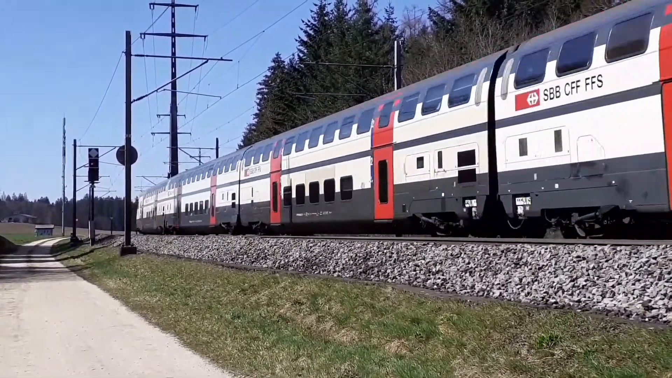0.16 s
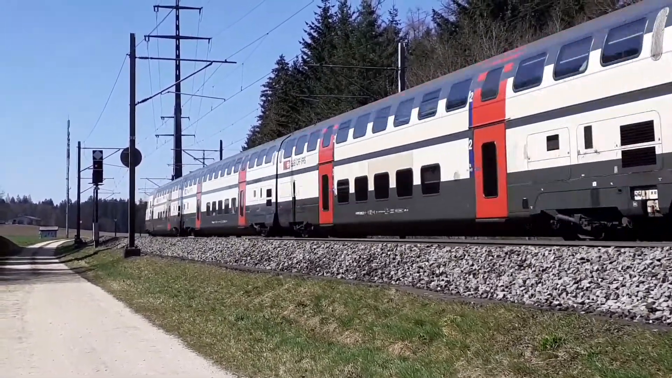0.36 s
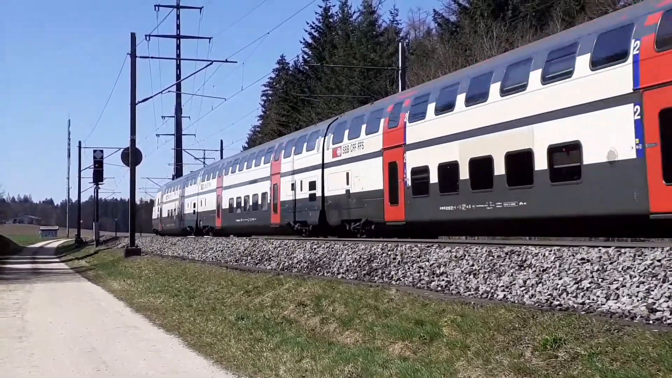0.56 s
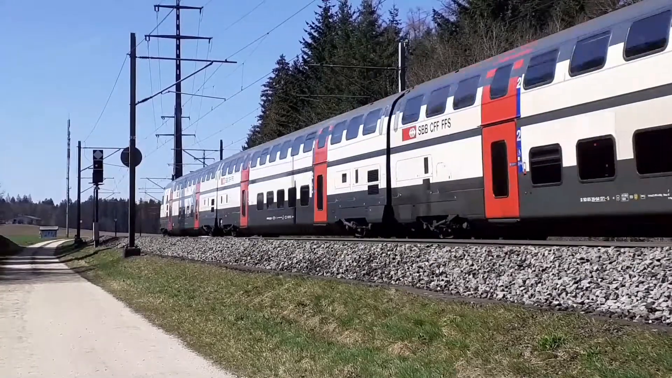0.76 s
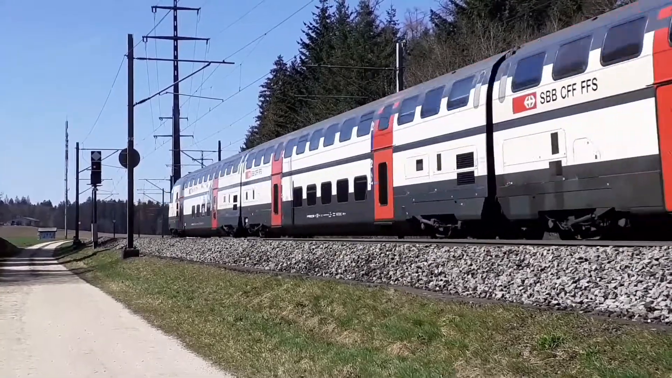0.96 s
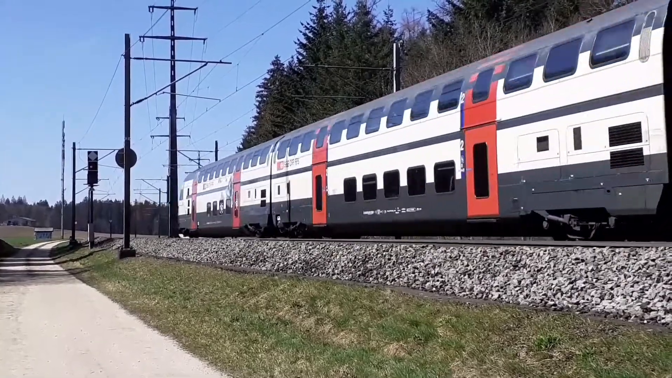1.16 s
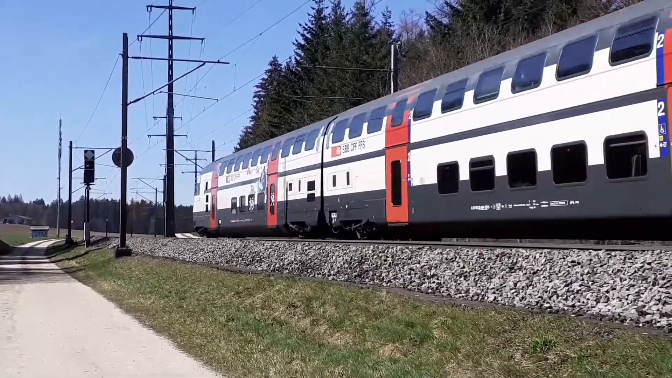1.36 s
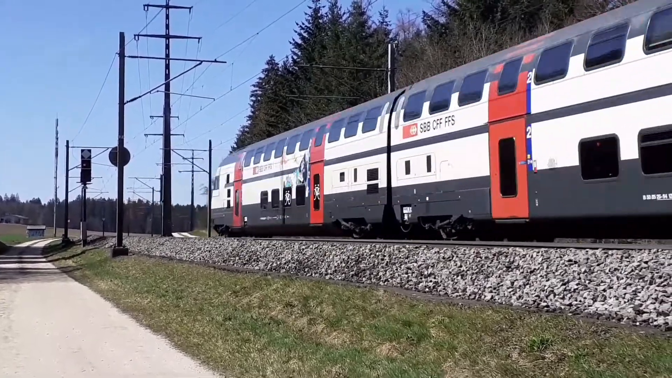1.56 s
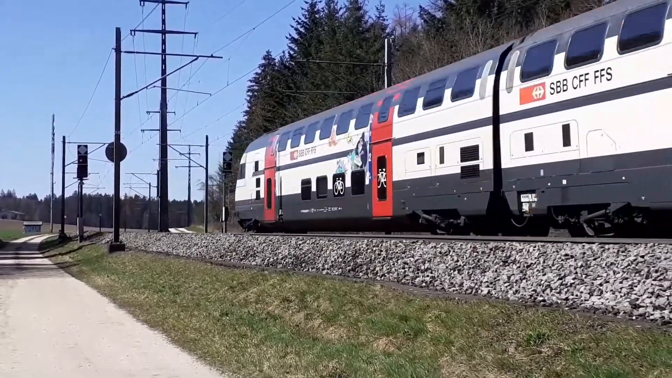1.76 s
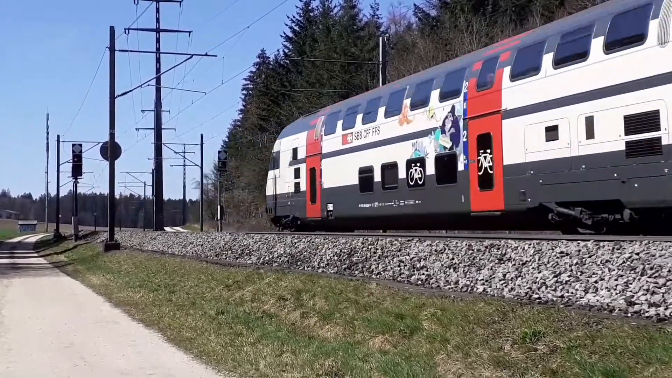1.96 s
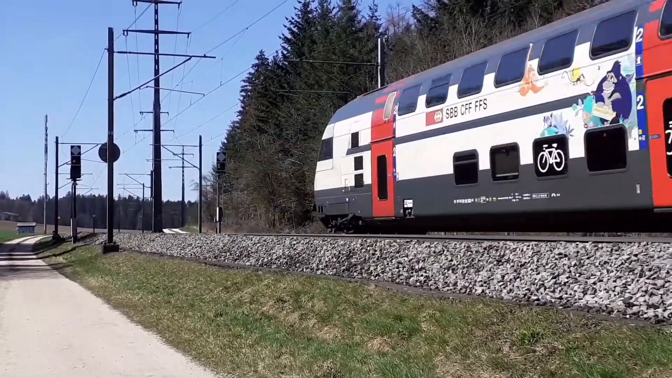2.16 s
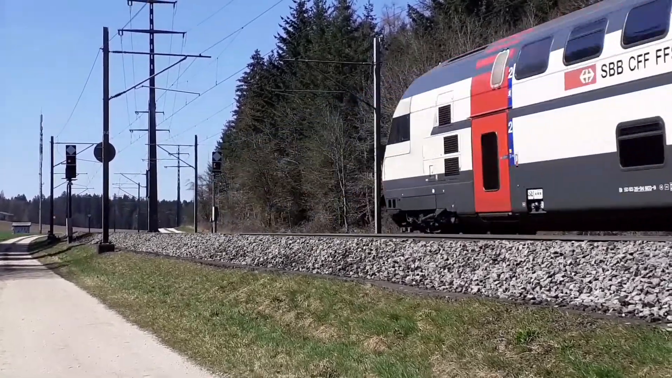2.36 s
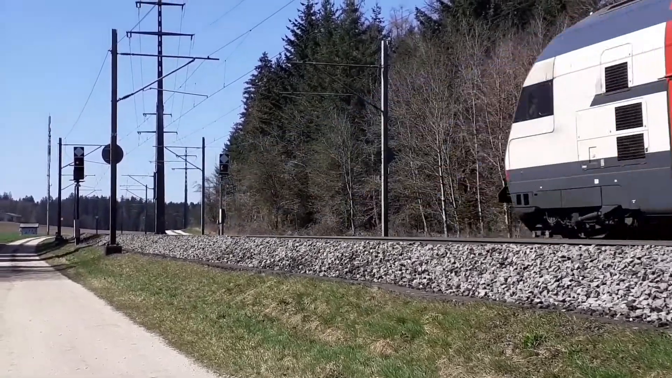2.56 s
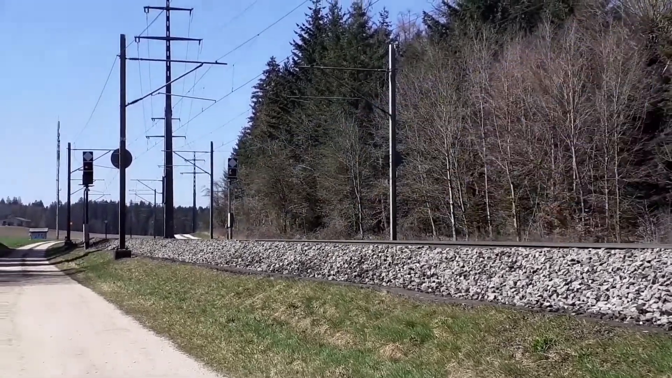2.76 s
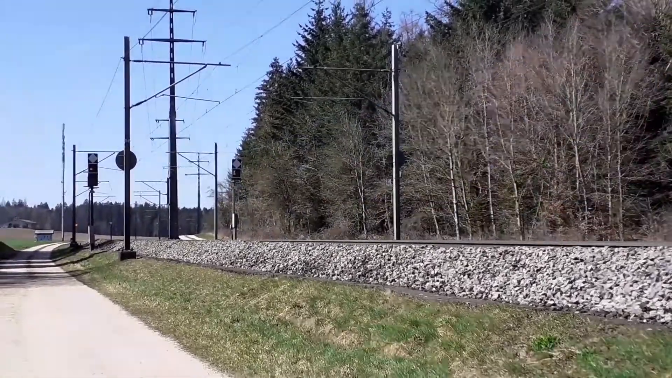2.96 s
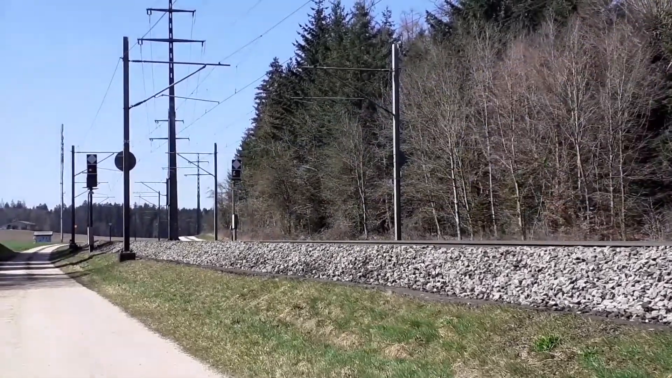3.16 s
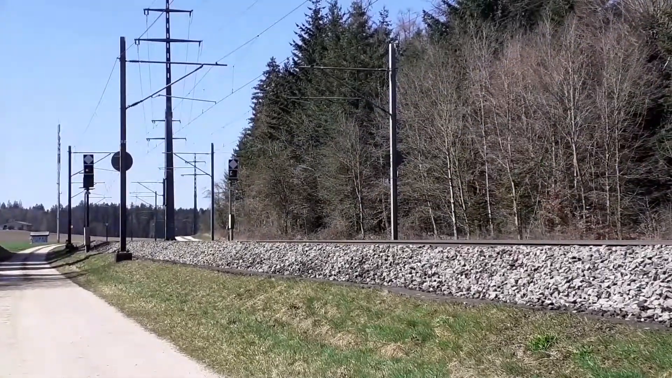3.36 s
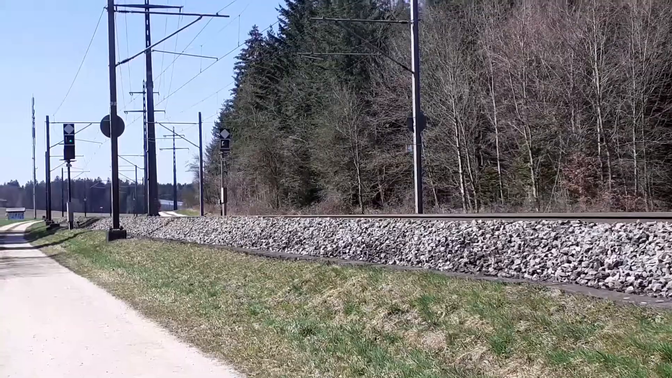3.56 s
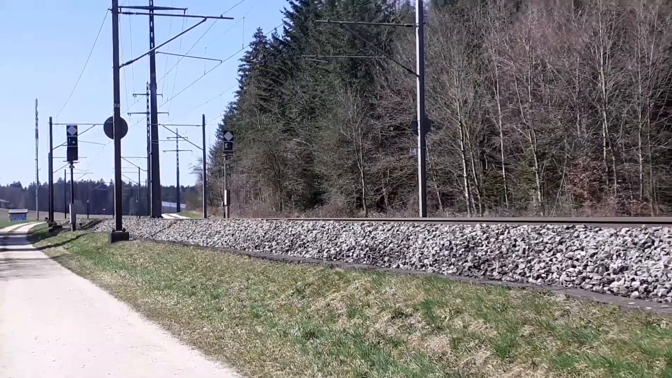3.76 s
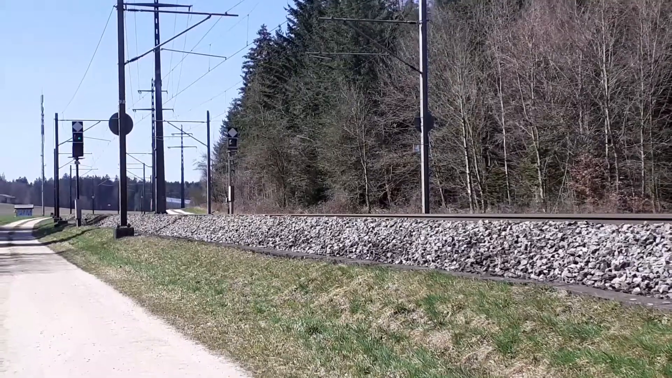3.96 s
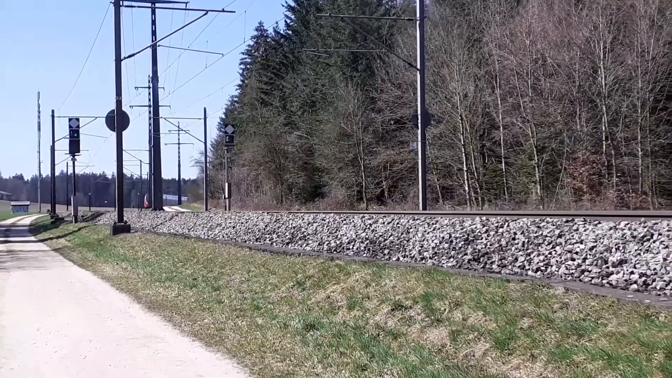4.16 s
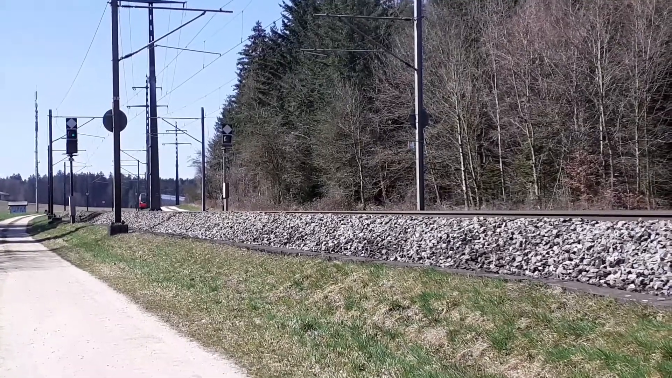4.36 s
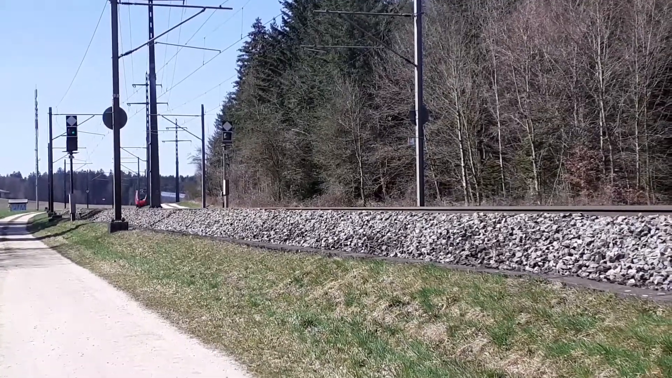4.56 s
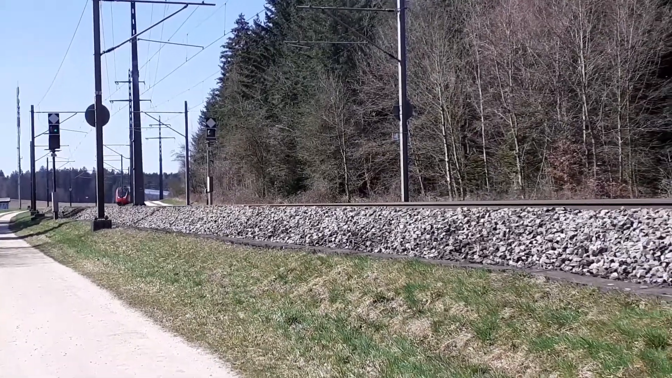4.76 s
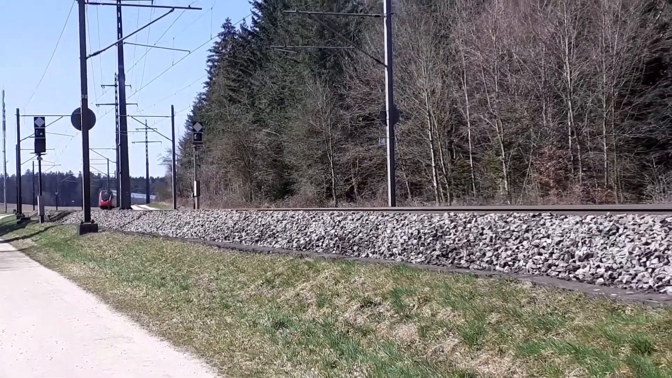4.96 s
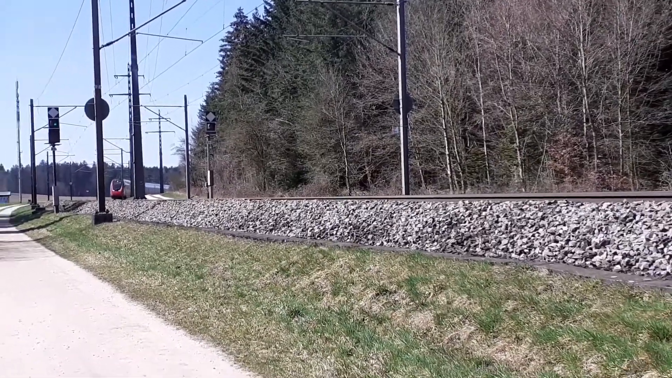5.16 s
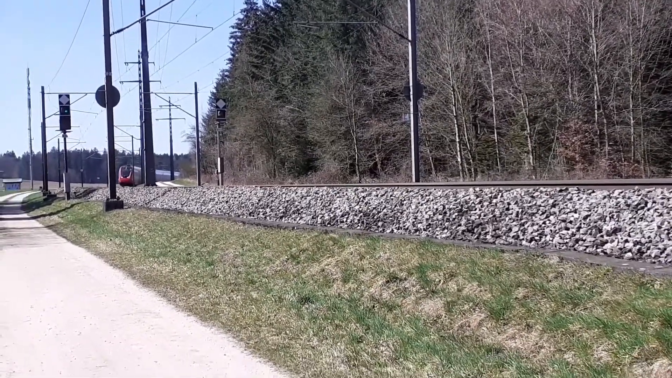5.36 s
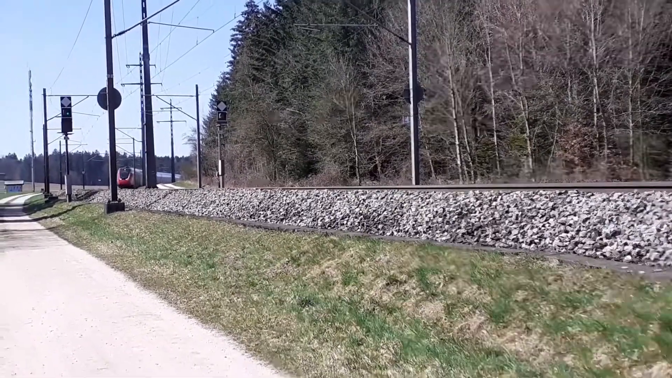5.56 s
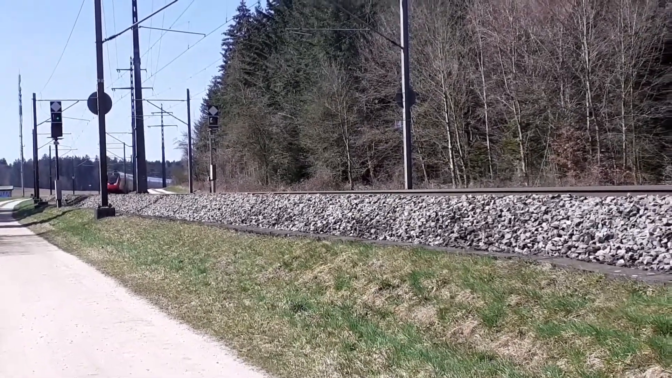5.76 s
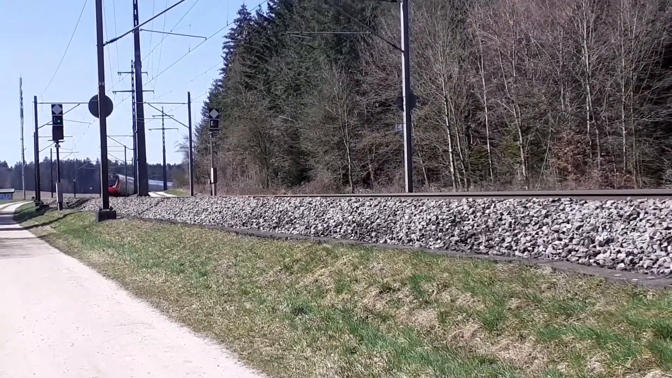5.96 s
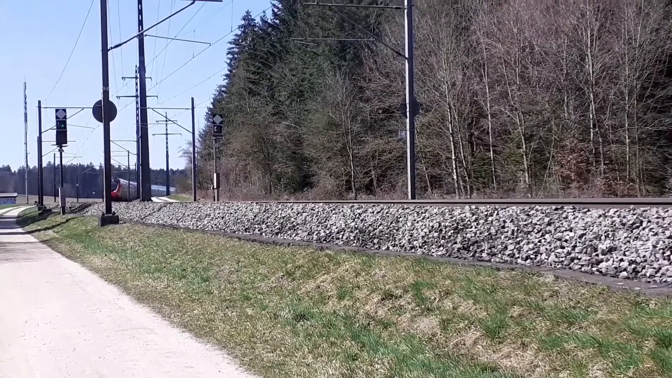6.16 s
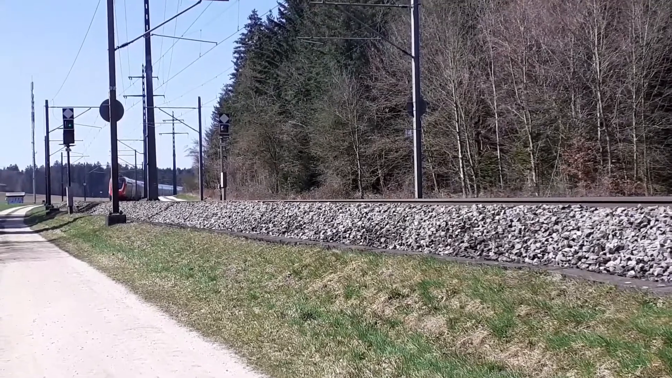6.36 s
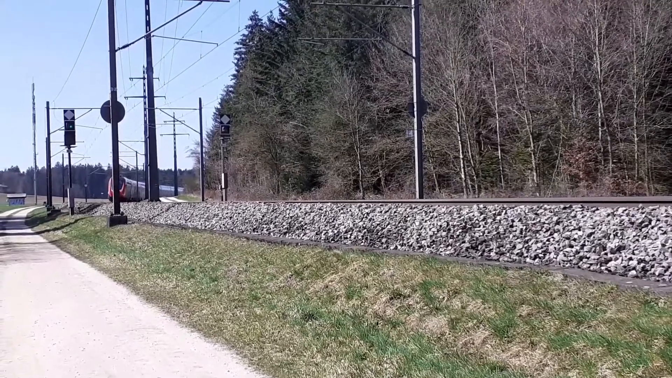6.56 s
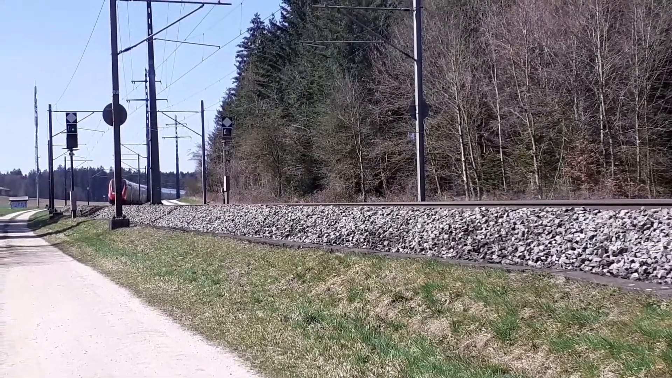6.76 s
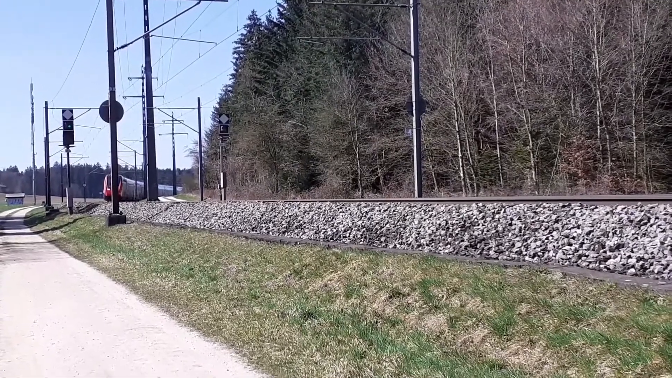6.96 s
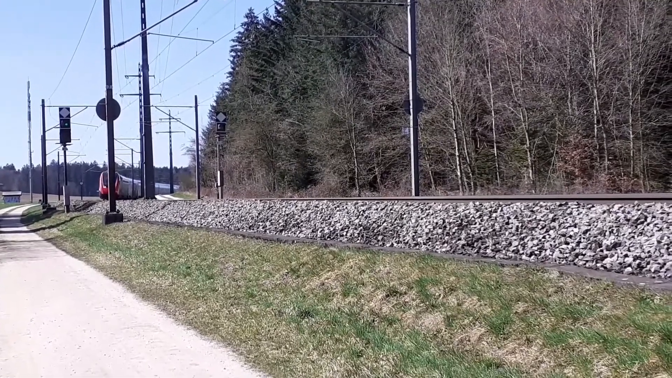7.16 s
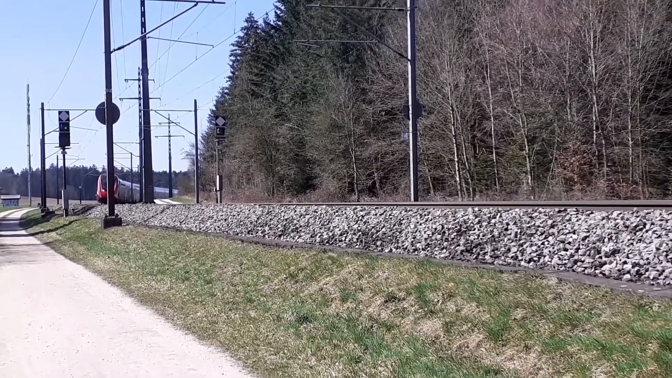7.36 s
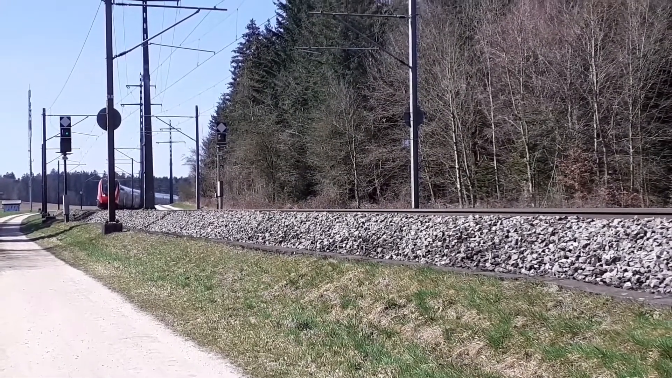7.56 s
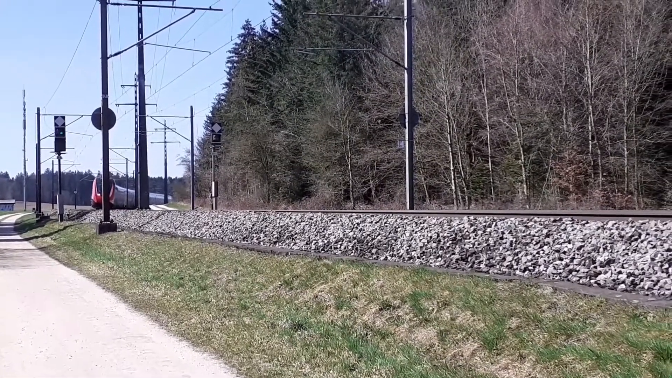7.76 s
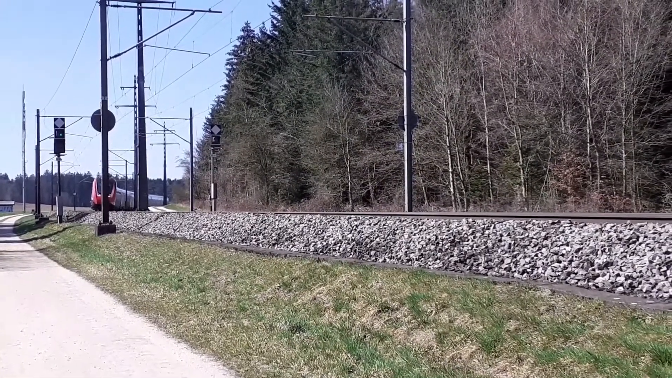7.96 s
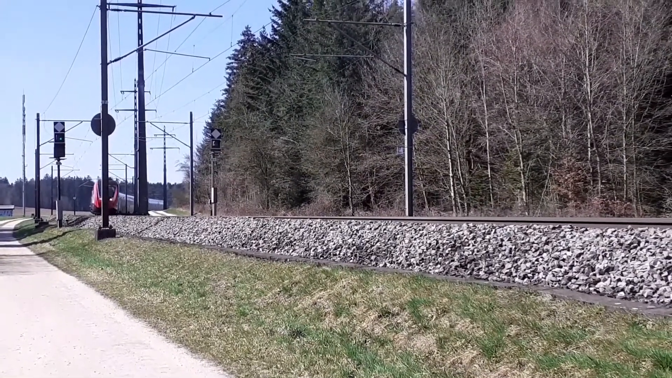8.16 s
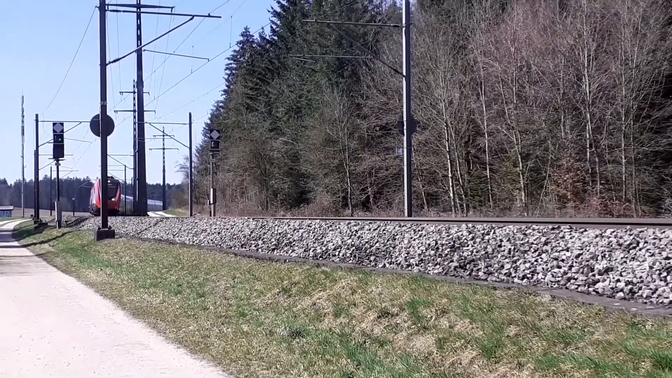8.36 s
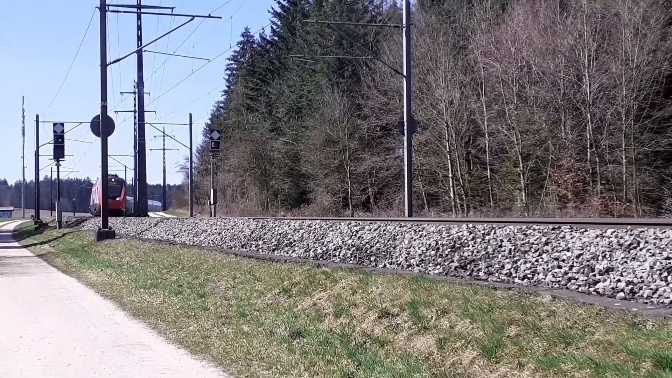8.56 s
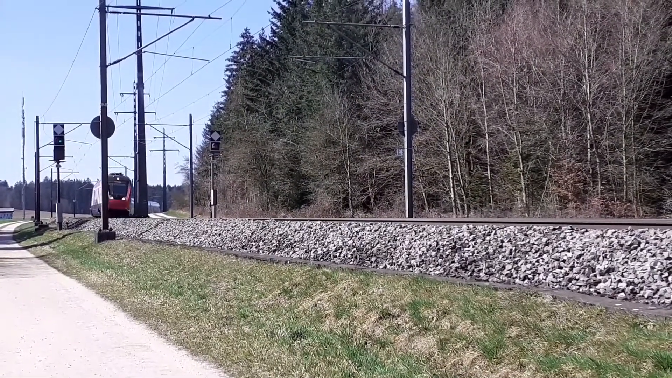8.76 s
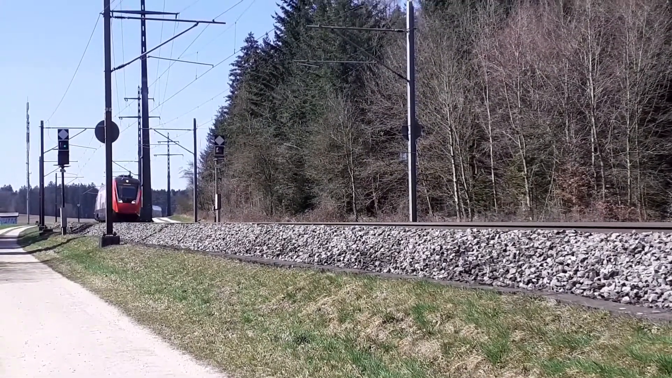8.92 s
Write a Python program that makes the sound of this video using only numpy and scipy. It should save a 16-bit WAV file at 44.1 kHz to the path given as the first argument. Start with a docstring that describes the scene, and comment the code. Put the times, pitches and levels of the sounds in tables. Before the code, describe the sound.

A passenger train roars past with ringing, squealing wheels, cuts off abruptly, then quiet birdsong, a light breeze and a distant train approaching.

```python
"""Field path by a railway: a double-deck passenger train rushes past; wheels roar, ring and fall in pitch.
The pass-by is banded noise swept by bogie, resonated wheel modes and gliding squeals.
After an abrupt cut the same place is quiet: a great tit and other birds, whistled along pitch tracks, call
from the forest edge; a breeze nudges the microphone; a second train, in growing noise bands, draws near."""
import sys
import numpy as np
from scipy import signal
from scipy.io import wavfile
from scipy.ndimage import map_coordinates

SR = 44100
rng = np.random.default_rng(int(sys.argv[2]) if len(sys.argv) > 2 else 0)


def master(y):
    """Save y as 16-bit WAV."""
    cut = np.clip(np.atleast_2d(y).T, -1, 1)
    pcm = np.round(cut * 32767)  # scale
    wavfile.write(sys.argv[1], SR, pcm.astype(np.int16))


N = 400869
TIME = np.arange(N) / SR
CUT_S, RESUME_S = 3.385, 3.405
SPEED_M_PER_S, TRACK_DISTANCE_M, SOUND_SPEED_M_PER_S = 34.0, 12.0, 343
PORT_LAG_MS = 0.518  # left port's lag for sound from due right
MIC_TURN_RAD = 0.34  # from up the line towards the track
CUTOFF_HZ = 15740


def from_db(db):
    """Decibels to amplitude."""
    return 10 ** (np.asarray(db) / 20)


def rms_one(x):
    """Scale to unit power."""
    return x / np.sqrt(np.mean(x ** 2) + 1e-20)


def in_time(rows):
    """One interpolated curve per table column after time."""
    time_s, *columns = np.transpose(rows)
    return [np.interp(TIME, time_s, column) for column in columns]


def at_hz(points, hz):
    """Read a spectrum on a log-frequency axis."""
    table_hz, values = np.array(points).T
    return np.interp(np.log(hz), np.log(table_hz), values)


def pan(balance_db):
    """Left and right gains of constant power; positive is left."""
    return rms_one(from_db([[balance_db / 2], [-balance_db / 2]]))


def drift(rate_hz):
    """Slow random signal with a spread of 1: noise through a double pole at SR / 40."""
    r = np.exp(-80 * np.pi * rate_hz / SR)
    noise = rng.standard_normal(N // 40 + 2002)
    slow = signal.lfilter([1], [1, -2 * r, r * r], noise)[2000:]
    return np.interp(np.arange(N) / 40, np.arange(len(slow)), rms_one(slow))


def resonate(x, hz, width_hz):
    """Two-pole resonance with gain 1 on top."""
    r = np.exp(-np.pi * width_hz / SR)
    zeros = np.array([1, 0, -1]) * (1 - r * r) / 2
    poles = [1, -2 * r * np.cos(2 * np.pi * hz / SR), r * r]
    return signal.lfilter(zeros, poles, x + 1e-18)


def stereo_noise(spectrum, likeness, balance):
    """Noise bands, relatively narrower in the treble, each with its level, likeness and pan; rms 1."""
    low_hz, top_hz = spectrum[0][0], min(spectrum[-1][0], .45 * SR)
    steps = int(np.ceil((top_hz ** .3 - low_hz ** .3) / .4))
    edges_hz = np.linspace(low_hz ** .3, top_hz ** .3, max(steps, 6) + 1) ** (1 / .3)
    white, out = rng.standard_normal((2, 2, N)), 0
    for k, band_hz in enumerate(zip(edges_hz, edges_hz[1:])):
        band_filter = signal.butter(2, band_hz, "band", fs=SR, output="sos")
        mid, side = signal.sosfilt(band_filter, white[k % 2])
        hz = np.sqrt(band_hz[0] * band_hz[1])
        alike = np.clip(at_hz(likeness, hz), -1, 1)
        mid, side = np.sqrt(1 + alike) * mid, np.sqrt(1 - alike) * side
        gains = from_db(at_hz(spectrum, hz)) * pan(at_hz(balance, hz))
        out = out + gains * np.array([mid + side, mid - side])
    return rms_one(out)


def from_right(x, off_axis_rad=MIC_TURN_RAD):
    """The left port hears the side of the track later."""
    lag_s = PORT_LAG_MS / 1000 * np.cos(off_axis_rad)
    return np.array([np.interp(TIME - lag_s, TIME, x[0]), x[1]])


def port_lag(t, abeam_s):
    """Left port's lag in seconds as a wheel swings from ahead to the right."""
    bearing_rad = np.arctan2(TRACK_DISTANCE_M, SPEED_M_PER_S * (abeam_s - t)) - MIC_TURN_RAD
    return PORT_LAG_MS / 1000 * np.sin(bearing_rad)


def wheel_path(t, abeam_s):
    """Emission time heard at each port (the Doppler glide), and how squarely the wheel faces the microphone."""
    distance_m = np.hypot(TRACK_DISTANCE_M, SPEED_M_PER_S * (t - abeam_s))
    emitted_s = t - (distance_m - TRACK_DISTANCE_M) / SOUND_SPEED_M_PER_S
    return np.array([emitted_s - port_lag(t, abeam_s), emitted_s]), TRACK_DISTANCE_M / distance_m


# two cars meet over a pair of bogies:
# (time abeam [s], rolling [dB], hiss [dB], wheel ring [dB], wheel pitch [multiple])
CAR_ENDS = [(.035, -28, -35.5, -31, 1.005), (.8, -25, -31.5, -32, 1.01), (1.62, -26.5, -31.5, -33, 1.001),
            (2.421, -28, -34, -33, 1.001), (3.19, -30, -37, -30, .985)]
BOGIE_GAP_S = .2  # within a pair


def bogies():
    """A row for each bogie, one before and one behind each car end."""
    return [(s + side * BOGIE_GAP_S / 2, *levels) for s, *levels in CAR_ENDS for side in (-1, 1)]


# pass-by noise spectra: (frequency [Hz], density [dB per Hz])
RUMBLE_SPECTRUM = [(15, -44.5), (25, -20.5), (47, -9), (81, 5), (105, -4), (146, -7.5), (170, -15),
                   (220, -40.5), (370, -120)]
BODY_SPECTRUM = [(130, -12), (170, -10.5), (260, -4.5), (340, -5), (480, -0.5), (560, -9), (800, -6.5),
                 (1050, -11.5), (1300, -29.5)]
ROLLING_SPECTRUM = [(850, -4), (1020, -5), (1300, -3.5), (1600, -8), (2100, -1), (2550, -5.5), (3300, -3.5),
                    (3800, -4), (4400, 4.5), (5200, -7.5), (6000, -14), (7000, -24)]
HISS_SPECTRUM = [(4500, -14), (5600, 3.5), (6500, 8.5), (7600, -0.5), (8600, -4.5), (9400, -31),
                 (10700, 4.5), (11700, -8), (12800, -4.5), (15000, -26), (15700, -33.5)]
# a single bogie's roar: (frequency [Hz], left-right likeness [-1 to 1])
BOGIE_LIKENESS = [(1100, 0.98), (1500, 0.38), (2200, 0.59), (2700, .55), (3150, 0.87), (3800, 0.83),
                  (4500, 0.21)]
# near sound: (frequency [Hz], left-right likeness [clipped to -1 to 1])
NEAR_LIKENESS = [(40, 3), (90, 1.5), (250, 1), (500, 0.74), (700, -0.13), (1040, 1.5), (1400, 4),
                 (3000, -0.7), (8000, -0.2)]
# near sound: (frequency [Hz], left minus right [dB])
NEAR_BALANCE = [(60, 0), (400, 1.5), (1300, 1.5), (2200, -2), (3000, -2), (4400, -8), (6300, -10),
                (10500, -16), (15000, -8)]
# low mids from the car bodies: (time [s], level [dB])
BODY_LEVEL = [(0.0, -33.5), (0.53, -32.5), (0.79, -30.5), (1.17, -32.5), (2.12, -33), (3.1, -32),
              (3.27, -29), (3.36, -28.5)]
ROLLING_BEAM, HISS_BEAM = 2.41, 2.15  # sideways aim, exponents
HISS_LEAD_S = 0.11  # hiss is thrown ahead of the wheels
RUMBLE_DB, RUMBLE_FADE_DB_PER_S = -32, 1.3


def rolling_roar(flutter_db=1.35):
    """Air and car bodies rumble; rough rails roar and hiss under each bogie, roar sweeping from ahead to right."""
    rumble = stereo_noise(RUMBLE_SPECTRUM, NEAR_LIKENESS, NEAR_BALANCE)
    body = stereo_noise(BODY_SPECTRUM, NEAR_LIKENESS, NEAR_BALANCE)
    hiss = stereo_noise(HISS_SPECTRUM, NEAR_LIKENESS, NEAR_BALANCE)
    rolling = stereo_noise(ROLLING_SPECTRUM, BOGIE_LIKENESS, NEAR_BALANCE)
    t, hiss_power = TIME[TIME < RESUME_S], 0
    rails = from_db(in_time(BODY_LEVEL)[0]) * from_right(body)
    for k, (abeam_s, rolling_db, hiss_db, _, _) in enumerate(bogies()):
        # each bogie has its own stretch of noise
        left, right = np.roll(rolling, -k * SR // 2, axis=1)[:, :len(t)]
        swept = np.array([np.interp(t - port_lag(t, abeam_s), t, left), right])
        _, facing = wheel_path(t, abeam_s)
        rails[:, :len(t)] += from_db(rolling_db) * facing ** ROLLING_BEAM * swept
        _, hiss_facing = wheel_path(t, abeam_s - HISS_LEAD_S)
        hiss_power += (from_db(hiss_db) * hiss_facing ** HISS_BEAM) ** 2
    rails += np.interp(TIME, t, np.sqrt(hiss_power)) * from_right(hiss)
    rumble_gain = from_db(RUMBLE_DB - RUMBLE_FADE_DB_PER_S * TIME)
    return rumble_gain * from_right(rumble) + from_db(flutter_db * drift(15)) * rails


BOOM_HZ, BOOM_WIDTH_HZ, BOOM_DB, BOOM_FADE_DB_PER_S = 248, 44, -35.5, 7


def boom():
    """One low resonance of the car bodies, stirred by the ride, dies away."""
    ring = rms_one(resonate(rng.standard_normal(N), BOOM_HZ, BOOM_WIDTH_HZ))
    gain = from_db(BOOM_DB - BOOM_FADE_DB_PER_S * TIME)
    return from_right(pan(0.9) * gain * ring)


# wheel modes at rest: (frequency [Hz], width [Hz], level [dB])
WHEEL_MODES = [(1614, 22, -9), (1915, 100, -7), (2133, 51, -5.5), (3547, 56, -17.5), (4285, 39, -3),
               (6447, 70.3, -5.5), (7800, 46, -16.5), (10750, 105.3, -13), (12800, 200, -19.5)]


def ringing_wheels(beam=4.3, unrest_db=3.0):
    """Rail roughness excites the wheel modes, which beam sideways and glide down in passing."""
    t, out = TIME[TIME < CUT_S], np.zeros((2, N))
    for abeam_s, _, _, level_db, pitch in bogies():
        emitted_s, facing = wheel_path(t, abeam_s)
        roughness = rng.standard_normal(len(t) + SR)
        ring = 0
        for hz, width_hz, db in WHEEL_MODES:
            mode = rms_one(resonate(roughness, hz * pitch, width_hz))
            ring = ring + from_db(db) * pan(at_hz(NEAR_BALANCE, hz)) * mode
        gain = from_db(level_db + unrest_db * drift(23.4)[:len(t)]) * facing ** beam
        for side in range(2):
            heard = map_coordinates(ring[side], [(emitted_s[side] + .5) * SR], order=3)
            out[side, :len(t)] += gain * heard
    return out


# a wheel mode sings out: (time loudest [s], half length [s], time until that wheel is abeam [s],
# frequency at rest [Hz], level before partials [dB], roughness [0-1])
SQUEALS = [(0.147, 0.046, -0.03, 6420, -23.5, 0.45), (0.234, 0.027, -0.06, 6370, -29, .4),
           (0.555, 0.032, 0.88, 4310, -22.5, 0.7), (0.68, 0.046, 0.35, 4260, -24, 0.5),
           (0.823, 0.0098, -0.12, 8250, -21.5, .1), (0.928, 0.021, .55, 4300, -18.5, 0.2),
           (1.016, 0.023, 0.46, 4300, -21.5, 0.65), (1.259, 0.066, 0.33, 4310, -22.5, 0.54),
           (1.37, 0.022, 0.084, 10740, -30.5, 0.6), (1.41, 0.034, .165, 4170, -13.5, 0.3),
           (1.462, 0.018, 0.088, 4170, -14.5, 0.2), (1.554, 0.039, 0.0021, 4162, -15, 0.25),
           (1.65, 0.012, -.05, 8450, -31.5, .3), (1.677, 0.048, -.04, 4170, -18, 0.34),
           (1.76, 0.046, -.03, 12780, -36, .8), (1.78, 0.015, -.1, 6440, -30, 0.3),
           (1.981, 0.088, .42, 4260, -26, 0.23), (2.311, 0.035, 0.085, 6160, -17.5, 0.23),
           (2.338, 0.08, .06, 3540, -30.5, .5), (2.378, 0.093, -0.053, 2120, -29.5, 0.67),
           (2.472, 0.042, -0.11, 6390, -19, 0.13), (2.585, 0.011, -.1, 6420, -28, .3),
           (2.585, 0.0077, -.15, 4270, -20.5, 0.3), (3.14, 0.018, .06, 6330, -25.5, .5),
           (3.157, 0.067, -0.038, 10720, -28.5, .85), (3.179, 0.011, -0.12, 4290, -12.5, 0.1),
           (3.217, 0.056, -0.0032, 8400, -36.5, .6), (3.282, 0.037, -0.024, 6260, -18.5, 0.26)]
# squeal partials: (frequency [multiple], level [dB])
SQUEAL_PARTIALS = [(1, 1.4), (2, -32), (3, -34.5)]


def squeals(waver_rate_hz=45):
    """Creep on the rail makes one mode sing: part steady tone, part stuttering ring, with faint overtones."""
    out = np.zeros((2, N))
    for s, half_s, lead_s, hz, db, rough in SQUEALS:
        near, rough = np.abs(TIME - s) < np.pi * half_s, np.clip(rough, 0, 1)
        emitted_s, _ = wheel_path(TIME[near], s + lead_s)
        stutter = drift(waver_rate_hz)[near] + 1j * drift(waver_rate_hz)[near]
        grip = np.sqrt(1 - rough) + np.sqrt(rough / 2) * stutter
        swell = np.exp(-.5 * ((TIME[near] - s) / half_s) ** 2) * np.abs(grip)
        phase = 2 * np.pi * hz * emitted_s + np.angle(grip)
        for multiple, partial_db in SQUEAL_PARTIALS:
            if multiple * hz < CUTOFF_HZ:
                gains = from_db(db + partial_db) * pan(at_hz(NEAR_BALANCE, multiple * hz))
                out[:, near] += gains * swell * np.sin(round(multiple) * phase)
    return out


# far train spectra: (frequency [Hz], density [dB per Hz])
FAR_DRONE = [(55, 1.5), (85, 6.5), (130, -6.5), (200, -4), (260, -8), (400, -13.5)]
FAR_ROLLING = [(150, -5), (300, -9.5), (700, -2), (1200, -2.5), (2200, -5), (3200, -12.5), (4500, -13),
               (6000, -20), (8000, -38)]
RAIL_HISS = [(5500, -40), (6900, -13), (7500, 12), (8400, -72), (9400, -70), (10800, 2.5), (13000, 1),
             (15500, 0)]
# sound from afar: (frequency [Hz], left-right likeness [-1 to 1])
FAR_LIKENESS = [(60, 0.83), (300, 0.73), (700, 0.56), (1400, 0.44), (3000, 0.83), (7000, 0)]
# sound from afar: (frequency [Hz], left minus right [dB])
FAR_BALANCE = [(60, 2), (400, 2.5), (1300, 1), (2400, -1.5), (4400, -1.5), (8000, -8), (15000, 0.5)]
# rows for drone, rolling, rail hiss:
# (level at the bend [dB], growth [dB per s], time of swell [s], gain in swell [dB])
APPROACH = [(-52.5, 1.5, 7.8, 9), (-52, 3.1, 7.67, 1.2), (-70, 1.5, 6.9, 5)]
BEND_TAKES_S = 0.25  # time scale of rounding the bend
FAR_LEAD_MS = .09  # left port hears first


def far_train():
    """Drone and dull rolling grow, faster round the bend; rails hiss ahead of the train, a little to the left."""
    total = 0
    for row, spectrum in zip(APPROACH, (FAR_DRONE, FAR_ROLLING, RAIL_HISS)):
        db, growth_db_per_s, bend_s, bend_db = row
        since_bend_s = TIME - bend_s
        swell_db = bend_db * np.tanh(since_bend_s / BEND_TAKES_S) / 2
        gain = from_db(db + growth_db_per_s * since_bend_s + swell_db)
        total = total + gain * stereo_noise(spectrum, FAR_LIKENESS, FAR_BALANCE)
    left, right = total
    return np.array([left, np.interp(TIME - FAR_LEAD_MS / 1000, TIME, right)])


def knocks(events, hz, width_hz):
    """Each push sets one damped resonance swinging."""
    out = np.zeros(N)
    for s, db in events:
        age_s = TIME[TIME > s] - s
        decay = np.exp(-np.pi * width_hz * np.minimum(age_s, .5))
        out[TIME > s] += from_db(db) * decay * np.sin(2 * np.pi * hz * age_s)
    return out


# still air over the field: (frequency [Hz], density [dB per Hz])
AIR_SPECTRUM = [(100, -1.5), (200, -8), (450, -11.5), (720, -11), (1000, -16), (1700, -22), (3000, -18),
                (6000, -25.5), (7600, -23), (9200, -40), (11500, -23), (15500, -21)]
# breeze on the microphone: (frequency [Hz], density [dB per Hz])
BREEZE_SPECTRUM = [(25, -4), (40, -8), (60, 15), (90, 11.5), (115, -18), (160, -3), (240, -23)]
# breeze strength: (time [s], level [dB])
BREEZE_LEVEL = [(3.47, -59.5), (3.84, -54), (4.15, -57), (4.65, -56), (6.95, -52), (7.26, -45.5),
                (9.05, -45.5)]
# breeze buffets: (time [s], level before decay [dB])
BUFFETS = [(4.318, -38), (4.342, -39), (5.088, -31.5), (6.195, -35), (6.215, -26.5)]
# light ticks at the microphone: (time [s], level before decay and pan [dB])
TICKS = [(6.148, -29)]


def open_air(air_db=-63.2):
    """Faint field noise, a breeze of varying level with damped buffets, and a tick."""
    air = from_db(air_db) * stereo_noise(AIR_SPECTRUM, FAR_LIKENESS, FAR_BALANCE)
    breeze_gain = from_db(in_time(BREEZE_LEVEL)[0])
    breeze = breeze_gain * stereo_noise(BREEZE_SPECTRUM, FAR_LIKENESS, FAR_BALANCE)
    buffets = knocks(BUFFETS, hz=86.0, width_hz=30)
    ticks = pan(-21) * knocks(TICKS, hz=3010, width_hz=990)
    return air + breeze + buffets + ticks


def add_note(out, s, pitch_hz, envelope):
    """Add a pure whistle along a pitch track."""
    start = round(s * SR)
    phase = 2 * np.pi * np.cumsum(pitch_hz) / SR
    note = (np.sqrt(2) * envelope * np.sin(phase))[:max(N - start, 0)]
    out[start:start + len(note)] += note


def tit_note(length_s, start_hz, end_hz, fall_s, attack_s):
    """The pitch plunges towards a held tone while the level fades."""
    age_s = np.arange(round(length_s * SR)) / SR
    pitch_hz = end_hz + (start_hz - end_hz) / (1 + age_s / fall_s) ** 2
    return pitch_hz, np.minimum(age_s / attack_s, 1) * np.cos(np.pi / 2 * age_s / length_s)


# great tit phrases: (time of falling note [s], its level [dB], level of the low note before it [dB]),
# before tremble, echo and pan
TIT_PHRASES = [(3.495, -53, -52), (3.781, -49, -51.5), (4.073, -48, -52), (4.368, -46.5, -46.5),
               (4.654, -47, -46), (4.955, -47.5, -47.5), (7.911, -47.5, -52.5), (8.182, -45, -43),
               (8.474, -44.5, -43.5), (8.76, -45, -45.5), (9.042, -48, -43.5)]
TIT_NOTE_GAP_S, TIT_FLICK_LEAD_S = .082, .012  # low to falling note; flick to low note
TIT_PITCH_SPREAD = 0.0032  # falling note's pitch share, phrase to phrase
TIT_FLICK_DB = -10  # relative to low note


def great_tit(quaver=.007, flutter_depth=.55):
    """See-saws between a quavering low note and a clean falling one; a tiny downward flick opens each phrase."""
    out, unsteady = np.zeros(N), 1 + quaver * drift(90)
    flutter = rms_one(np.abs(1 + flutter_depth * drift(70)))
    flick_hz, flick_shape = tit_note(length_s=.018, start_hz=4500, end_hz=3550, fall_s=.014, attack_s=.003)
    low_hz, low_shape = tit_note(length_s=.068, start_hz=4850, end_hz=4090, fall_s=.004, attack_s=.012)
    falling_hz, falling_shape = tit_note(length_s=.066, start_hz=6000, end_hz=4265, fall_s=.009, attack_s=.01)
    for s, falling_db, low_db in TIT_PHRASES:
        low_s = s - TIT_NOTE_GAP_S
        span = round(low_s * SR) + np.arange(len(low_hz))
        add_note(out, low_s - TIT_FLICK_LEAD_S, flick_hz, from_db(low_db + TIT_FLICK_DB) * flick_shape)
        add_note(out, low_s, unsteady[span] * low_hz, from_db(low_db) * flutter[span] * low_shape)
        pitch = 1 + rng.normal(0, TIT_PITCH_SPREAD)
        add_note(out, s, pitch * falling_hz, from_db(falling_db) * falling_shape)
    return out


# songbird calls, note by note:
# (time into call [s], length [s], start [Hz], end [Hz], level relative to call [dB])
SLUR = [(-.075, 0.105, 2380, 2770, -12.5), (-.065, 0.081, 3030, 3300, -17), (0, 0.032, 2760, 3180, -1)]
PIP = [(0.002, 0.024, 2510, 2730, -3.5)]
RASP = [(0, 0.0128, 3670, 2410, 4.5), (0, 0.047, 3200, 3160, -4.5)]
CHIP = [(0, .03, 5300, 3400, 0)]
TWITTER = [(0, 0.0395, 7000, 7540, 0), (.05, 0.031, 8200, 7400, 0), (.1, .06, 7200, 7700, -2)]
SEEP = [(0, .014, 5240, 4410, -11), (.008, .045, 4400, 4400, -1.5)]
# when each call is heard: (time [s], level before notes, tremble, echo and pan [dB])
SLURS = [(3.751, -49), (4.376, -47.5)]
PIPS = [(4.985, -54), (5.08, -54), (5.208, -51), (5.655, -51.5), (5.746, -54), (5.846, -53.5)]
RASPS = [(4.958, -68), (5.052, -61), (5.721, -62), (5.82, -63)]
CHIPS = [(5.578, -70), (5.918, -73), (6.46, -73), (7.06, -68), (7.15, -68)]
TWITTERS = [(3.72, -70)]
SEEPS = [(5.211, -57), (6.24, -62.5)]


def songbird(warble=.027):
    """Hoarse calls made of short straight glides with a shaken pitch."""
    out, hoarse = np.zeros(N), 1 + warble * drift(170)
    repertoire = ((SLUR, SLURS), (PIP, PIPS), (RASP, RASPS), (CHIP, CHIPS), (TWITTER, TWITTERS), (SEEP, SEEPS))
    for notes, calls in repertoire:
        for s, call_db in calls:
            for into_s, length_s, start_hz, end_hz, db in notes:
                along = np.linspace(0, 1, round(length_s * SR))
                glide_hz = start_hz + (end_hz - start_hz) * along
                pitch_hz = glide_hz * hoarse[round((s + into_s) * SR):][:len(along)]
                add_note(out, s + into_s, pitch_hz, from_db(call_db + db) * np.sin(np.pi * along))
    return out


def forest(x, echo_db, t60_s):
    """Countless trunks scatter a call into a diffuse tail, another one for each side."""
    age_s = np.arange(SR) / SR
    decay = from_db(-60 * age_s / t60_s) * np.minimum(age_s / .02, 1)
    tail = rms_one(rng.standard_normal((2, SR)) * decay) / np.sqrt(SR)
    return x + from_db(echo_db) * signal.fftconvolve(x[None], tail, axes=1)[:, :N]


TIT_OFF_AXIS_RAD = .5


def birds(tremble_db=1.7):
    """The great tit sings on the right, the other birds a little left in the trees; levels tremble."""
    tremble = from_db(tremble_db * drift(70))
    tit = from_right(forest(great_tit() * tremble, echo_db=-1.5, t60_s=0.74), TIT_OFF_AXIS_RAD)
    others = forest(songbird() * tremble, echo_db=-3.0, t60_s=0.28)
    return pan(-10.5) * tit + pan(2.3) * others


def scene():
    """The pass-by ends abruptly and the quiet field follows."""
    before = np.clip((CUT_S - TIME) / 0.031, 0, 1)
    after = np.clip((TIME - RESUME_S) / 0.011, 0, 1)
    passing = rolling_roar() + boom() + ringing_wheels() + squeals()
    quiet = far_train() + open_air() + birds()
    return before * passing + after * quiet


def record(dry, dip_hz=9300, dip_width_hz=700, dip_depth=0.37):
    """The microphone ports weaken a narrow band of treble, and the top is cut steeply."""
    coloured = dry - np.clip(dip_depth, 0, 1) * resonate(dry, dip_hz, dip_width_hz)
    top_cut = signal.ellip(12, .1, 90, CUTOFF_HZ, fs=SR, output="sos")
    return signal.sosfilt(top_cut, coloured)


dry = scene()
out = record(dry)
master(out)
```